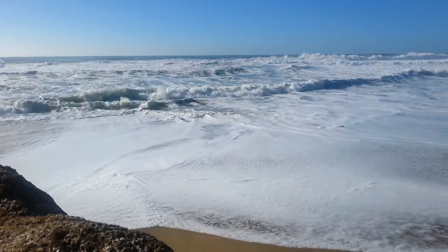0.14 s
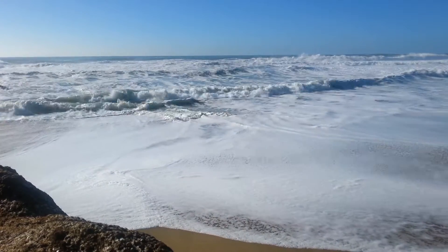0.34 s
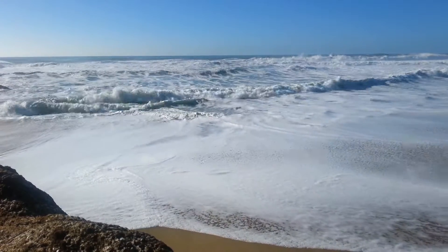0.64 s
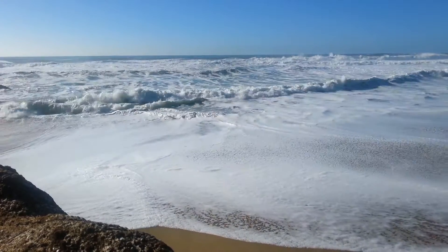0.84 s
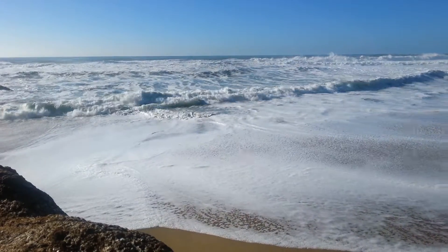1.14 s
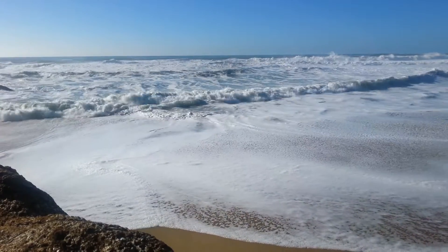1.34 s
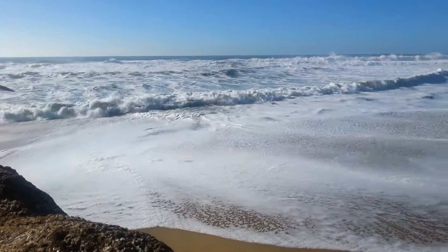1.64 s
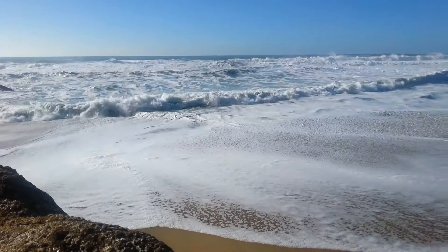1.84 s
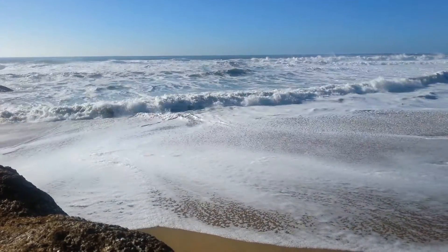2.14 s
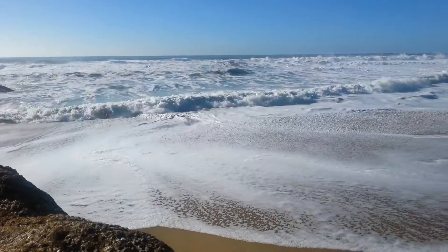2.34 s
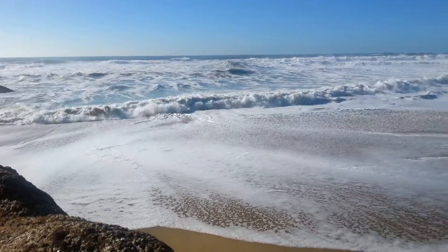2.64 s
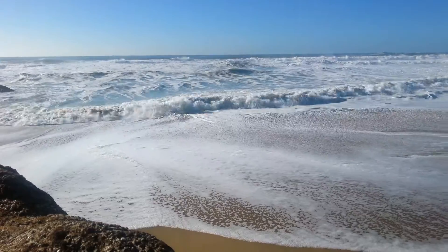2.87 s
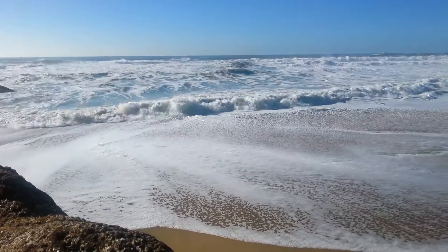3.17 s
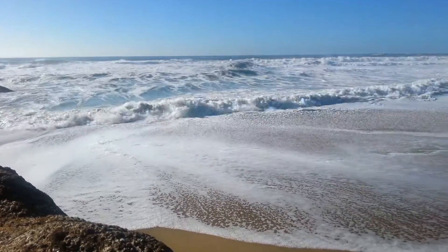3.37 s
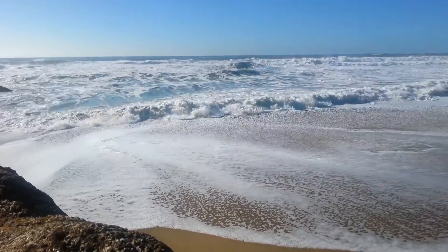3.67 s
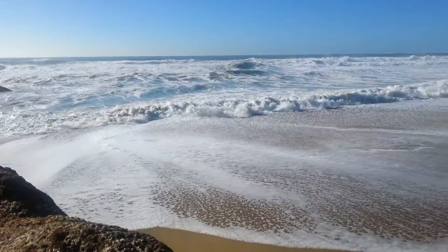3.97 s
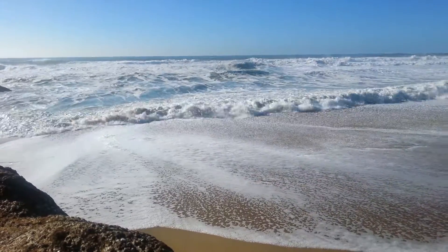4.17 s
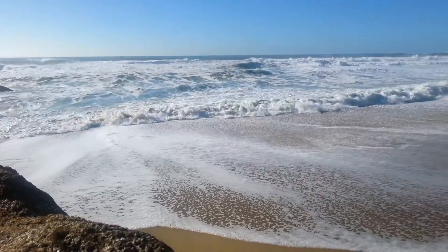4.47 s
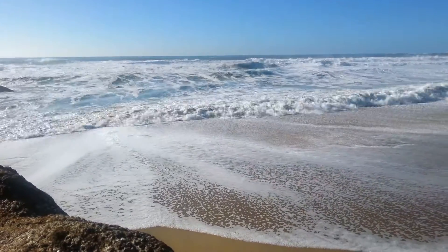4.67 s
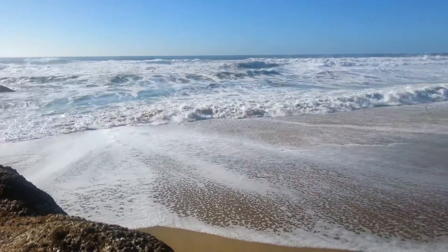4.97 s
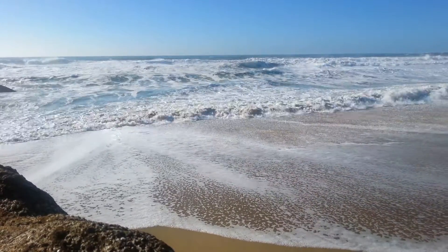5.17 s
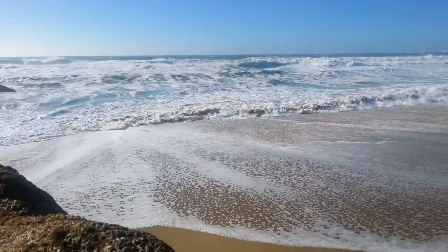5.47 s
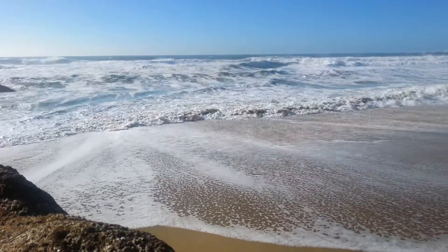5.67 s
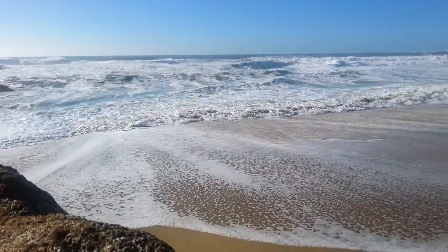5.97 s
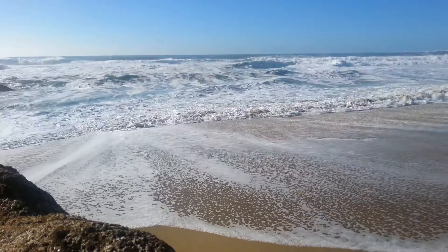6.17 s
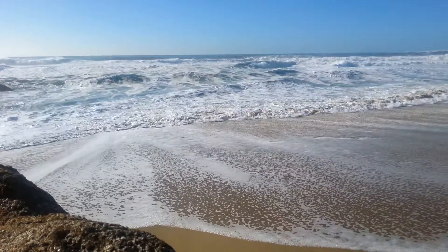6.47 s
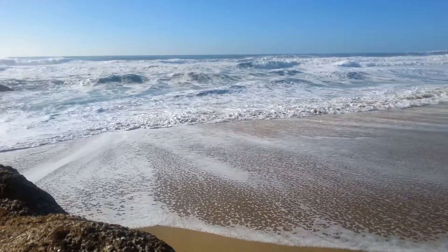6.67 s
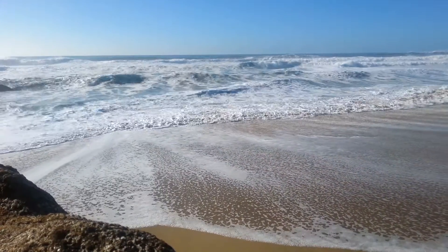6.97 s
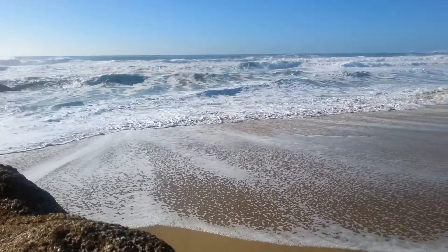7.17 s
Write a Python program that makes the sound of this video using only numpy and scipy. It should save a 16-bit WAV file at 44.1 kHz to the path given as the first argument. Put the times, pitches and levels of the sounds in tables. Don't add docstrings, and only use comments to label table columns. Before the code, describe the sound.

Heavy surf roars steadily off a sandy beach with fizzing foam while strong gusts thump, pop and flutter against an unprotected stereo microphone.

```python
import sys
import numpy as np
from scipy import signal
from scipy.fft import rfft, irfft, next_fast_len
from scipy.io import wavfile
from scipy.ndimage import uniform_filter1d, map_coordinates

SR = 44100
rng = np.random.default_rng(int(sys.argv[2]) if len(sys.argv) > 2 else 0)


def volts_from_db(level):
    exponent = np.asarray(level, float) / 20
    return 10 ** exponent


def wrap_up_sound(samples):
    columns = np.atleast_2d(samples).T
    tamed = np.clip(columns, -1, 1)
    steps = np.round(tamed * 32767).astype(np.int16)
    wavfile.write(sys.argv[1], SR, steps)


N = 322791


def unit(x):
    return x / np.sqrt(np.mean(x ** 2) + 1e-20)


def along(points, hz):
    f, v = np.transpose(points)
    return np.interp(np.log(hz + 1), np.log(f + 1), v)


def curves(rows):
    s, *cols = np.transpose(rows)
    return np.array([np.interp(np.arange(N) / SR, s, c) for c in cols])


def wobble(rate_hz):
    knots = rng.standard_normal(int(N / SR * 200))
    return map_coordinates(knots, [np.arange(N) * min(rate_hz, 190) / SR])


def filtered(x, response):
    m = next_fast_len(N + 8192)
    return irfft(rfft(x, m) * response(np.fft.rfftfreq(m, 1 / SR)), m)[..., :N]


def gusts():
    # t/s at full strength, held/s, left level/dB, right level/dB, suppressor opening/dB
    gust_rows = [(.18, .05, -17, -18, 3), (.34, .1, -21, -15, 5.5), (.455, .05, -19, -20, 0),
                 (.615, .04, -29.5, -21, 4.5), (.905, .09, -22, -17, 3.5), (1.14, .11, -23.5, -15.5, 3),
                 (1.31, .05, -22, -22, 1), (1.439, .05, -17.5, -21, 4), (2.135, .08, -24, -20.5, 2),
                 (2.291, .14, -26.5, -22, 3.5), (2.56, .06, -21.5, -18, 3), (2.9, .25, -26, -25.5, -1),
                 (3.362, .06, -27.5, -26, -0.5), (3.77, .09, -27, -23, 3.5),
                 (3.921, .27, -24.5, -18.5, 4.5), (4.39, .08, -24, -22, 3.5), (4.664, .03, -25, -23, 4.5),
                 (4.77, .14, -20.5, -16, 5), (5.308, .08, -21.5, -18.5, 3.5), (5.48, .1, -21, -19, 2.5),
                 (5.85, .12, -24.5, -17.5, 5), (6.055, .1, -26, -20.5, 5.5), (6.368, .04, -24.5, -23.5, 5),
                 (6.54, .04, -25.5, -22, 6)]
    # t/s, left level/dB, right level/dB
    lull = [(0, -32.5, -26), (1.9, -32, -36), (3.6, -33, -30), (4.5, -28.5, -24), (5.1, -25.5, -24),
            (7.32, -28.5, -27)]
    rise_db_s, fall_db_s = 280.5, 60.5
    open_db_s, close_db_s, linger_s = 111, 23, 0.011
    s, held, left, right, opens = np.transpose(gust_rows)[..., None]
    t = np.arange(0, N, 64) / SR

    def loss(up_db_s, down_db_s, more_s=0):
        before = (s - t) * up_db_s
        after = (t - s - held - more_s) * down_db_s
        return np.maximum(0, np.maximum(before, after))

    def per_sample(v):
        return np.interp(np.arange(N) / SR, t, v)

    gust_db = np.array([left, right]) - loss(rise_db_s, fall_db_s)
    power = np.sum(volts_from_db(2 * gust_db), axis=1)
    opening_db = np.max(np.maximum(0, opens - loss(open_db_s, close_db_s, linger_s)), axis=0)
    total = volts_from_db(2 * curves(lull)) + [per_sample(p) for p in power]
    return 10 * np.log10(total), per_sample(opening_db)


def churn(patchy_db):
    z = signal.stft(rng.standard_normal((2, N)), nperseg=512)[2]
    field = uniform_filter1d(rng.standard_normal(z.shape[1:]), size=6, axis=0)
    field = uniform_filter1d(field, size=14, axis=1)
    return signal.istft(z * volts_from_db(patchy_db * unit(field)), nperseg=512)[1][:, :N]


def water(left, right, lead):
    # f/Hz, left-right likeness (0-1)
    alike = [(60, 0.98), (300, 1), (700, 0.91), (1200, 1), (1700, 0.11), (2240, 0.27), (2750, 0.74),
             (3300, 0.13), (6000, 0.091), (12000, 0.067)]

    def mid_side(hz):
        turn = np.arccos(np.clip(along(alike, hz), -1, 1)) / 2
        return np.array([np.cos(turn), np.sin(turn)])

    def port_response(hz):
        phase = np.outer([1, -1], np.interp(hz, *np.transpose(lead)))
        return volts_from_db([along(left, hz), along(right, hz)]) * np.exp(.5j * phase)

    mid, side = filtered(churn(patchy_db=0.66), mid_side)
    x = filtered(np.array([mid + side, mid - side]), port_response)
    return x / np.std(filtered(x, lambda hz: (hz > 1200) & (hz < 9000)))


def sea(opening_db):
    # t/s, share of the late aim (0-1), sea level/dB
    swell = [(0, 0.08, -35.5), (.55, .08, -39), (1.2, .03, -35.5), (1.6, .1, -36), (2.0, .2, -34.5),
             (2.4, 0.23, -35), (2.7, 0.1, -35.5), (3.05, 0.26, -36), (3.6, 0.5, -36), (4.1, .78, -37),
             (4.7, .8, -36), (5.2, 0.84, -36), (5.75, .9, -36.5), (6.3, 0.93, -39.5), (6.8, 0.91, -37.5),
             (7.32, 0.77, -38.5)]
    # f/Hz, density/dB per Hz
    left_first = [(40, -37), (110, -6), (239, -1), (485, -16), (715, -8), (884, -16), (1994, -19),
                  (2465, -18), (3048, -28), (3903, -23), (5558, -33.5), (6632, -41), (10500, -42),
                  (14700, -59)]
    right_first = [(40, -25.5), (110, -14.5), (140, -1), (256, -7), (539, -12.5), (983, -13), (1259, -19),
                   (2066, -24.5), (3048, -30), (4189, -27), (5758, -34), (7914, -31), (10500, -46),
                   (14700, -74)]
    left_late = [(40, -22.5), (239, 2.5), (450, -12), (745, -9), (854, -26), (1133, -12), (2066, -23),
                 (2380, -16.5), (2942, -26.5), (3768, -24.5), (7500, -42.5), (9200, -41.5), (10200, -48.5),
                 (14700, -63)]
    right_late = [(40, -28), (110, -4.5), (239, -2), (854, -18), (1451, -16.5), (1671, -22.5), (1994, -20),
                  (3903, -32.5), (4825, -31), (5558, -38.5), (7639, -33.5), (9443, -42.5), (10500, -51.5),
                  (14700, -73)]
    # f/Hz, lead/rad
    lead_first = [(0, 0), (860, -1.0), (1290, -1.17), (2150, -6.5), (2760, -9.5), (4740, -13),
                  (5510, -24.5), (5940, -22), (7320, -33), (9220, -39.5), (10200, -36), (11400, -44.5),
                  (11900, -33.5), (14300, -29)]
    lead_late = [(0, 0), (780, 0.5), (1550, 2.5), (2410, -0.8), (3100, -5), (3880, -4.5), (5600, 2),
                 (6370, 4), (6630, 1.6), (8790, -10), (10100, -16.5), (11100, -2.5), (11700, -16.5),
                 (14300, -12)]
    roar_db, roar_pan_db = 0.04, -2.4
    foam_db, foam_pan_db, foam_turn_db = 0.32, -0.7, 1

    aim, swell_db = curves(swell)
    aim = np.clip(aim, 0, 1)
    surf = np.sqrt(1 - aim) * water(left_first, right_first, lead_first)
    surf += np.sqrt(aim) * water(left_late, right_late, lead_late)
    roar = filtered(surf, lambda hz: 1 / (1 + (hz / 3000) ** 6))
    foam = surf - roar
    side = np.array([[.5], [-.5]])
    mix = roar * volts_from_db(roar_db + side * roar_pan_db)
    mix += foam * volts_from_db(foam_db + side * (foam_pan_db + foam_turn_db * aim))
    return mix * volts_from_db(swell_db + opening_db + 1.5 + 0.32 * wobble(25))


def small_pops(level_db, count):
    pitch_hz, cycles, scatter_oct = 245, 1.4, 0.29
    over_gust_db, spread_db, top_db = 8, 1.9, -13.5
    share = np.cumsum(volts_from_db(1.3 * level_db))
    pitch, size, long = rng.standard_normal((3, count))
    quantile = (np.arange(count) + rng.uniform(0, 1, count)) / count
    at = np.searchsorted(share / share[-1], quantile).clip(1600, N - 1)
    peak_db = np.minimum(level_db[at] + over_gust_db + spread_db * size, top_db)
    hz = pitch_hz * 2 ** (scatter_oct * pitch)
    return list(zip(at / SR, peak_db, hz, cycles * 2 ** (scatter_oct * (pitch + long))))


def pops(rows):
    out, t = np.zeros(N + SR), np.arange(-1500, 1500) / SR
    chances = rng.uniform(-1, 1, (len(rows), 3))
    for (s, db, hz, cycles), (phase, upper, glide) in zip(rows, chances):
        bump = np.exp(-(t * hz / max(0.71 * cycles, .2)) ** 2)
        angle = 2 * np.pi * hz * t * (1 + 18 * glide * t) + np.pi * phase
        shake = np.cos(angle) + 0.25 * bump * np.cos(1.9 * angle + np.pi * upper)
        out[round(s * SR) - 1500:][:len(t)] += volts_from_db(min(db - .8, -.7)) * bump * shake
    return out[:N]


def wind(level_db):
    # f/Hz, density/dB per Hz
    buffet_curve = [(25, -43), (45, -17), (80, -4), (130, -1.5), (210, 2), (330, -7.5), (500, -14.5),
                    (800, -27), (1500, -39), (4000, -63.5)]
    rasp_curve = [(150, -16), (300, -2.5), (450, 5), (800, -11.5), (1500, -20), (4000, -65.5)]
    # t/s, peak/dB, f/Hz, length/cycles
    left_pops = [(.184, -5, 326, 3.3), (.201, -2, 293, 0.72), (.406, -7, 274, .8), (.466, -8, 262, 1.6),
                 (.993, -12, 296, 2.3), (1.314, -13, 310, 2.5), (1.337, -17, 281, 1.6),
                 (1.442, -8, 290, 1.2), (2.435, -5, 263, 0.88), (2.604, -11, 246, 1.9),
                 (3.358, -9, 250, 1.5), (4.039, -9, 204, 1.3), (4.239, -9, 212, 1.2), (4.385, -9, 264, 1.4),
                 (4.418, -10, 220, 1.2), (4.893, -14, 232, 1.2), (5.407, -18, 221, 0.71),
                 (5.509, -10, 280, 1.5), (5.884, -16, 262, 1.5), (6.595, -10, 224, 1.4)]
    right_pops = [(.186, -6, 204, .95), (.207, 2, 285, 0.62), (.289, -1.5, 307, 1.34),
                  (.351, -4.5, 232, 1.1), (.373, -2.5, 310, 1.9), (.427, -29, 264, .9),
                  (.615, -1.5, 279, 1.26), (.906, -4.5, 328, 0.93), (.921, -4.5, 212, 2.6),
                  (.944, 1.5, 183, 0.98), (1.05, -5.5, 245, 1.1), (1.136, -8, 238, 1.5),
                  (1.168, -5, 380, 2.2), (1.19, 3, 283, 2.1), (1.24, -8, 340, 3.6), (1.487, -7.5, 204, 1.1),
                  (2.382, -5, 177, 1.3), (3.917, -4, 313, 1.9), (4.121, -6, 329, 1.4),
                  (4.154, -3, 280, 0.55), (4.384, -3, 310, 1.5), (4.67, -12, 235, 1.6), (4.894, -3, 336, 4),
                  (4.958, -6, 301, 1.3), (5.358, -6, 214, 1.3), (5.518, -5, 229, 4.1),
                  (5.919, -2.5, 276, 4.3), (6.066, -9.5, 260, 1.3), (6.366, -2.5, 220, 0.85),
                  (6.553, -4.5, 254, 1.15)]
    # t/s, peak/dB, width/s, port (0 left, 1 right)
    snaps = [
        (.2075, 5.5, .00027, 0),
        (1.1426, -9, .0003, 1),
        (4.7906, -12, .00025, 1),
        (4.894, -4, .0004, 1),
        (5.367, -3, .0005, 1),
    ]

    eddies = volts_from_db(2.4 * np.array([wobble(45), wobble(45)])) * rng.standard_normal((2, N))
    rumble = unit(filtered(eddies, lambda hz: volts_from_db(along(buffet_curve, hz))))
    rasp = unit(filtered(eddies, lambda hz: volts_from_db(along(rasp_curve, hz))))
    rasp_db = 0.61 * (level_db + 8.5) - 11.0
    out = volts_from_db(level_db) * (rumble + volts_from_db(rasp_db) * rasp)

    left = pops(left_pops + small_pops(level_db[0], count=24))
    right = pops(right_pops + small_pops(level_db[1], count=56))
    bursts = np.array([left, right])
    near = np.abs(uniform_filter1d(np.abs(bursts), size=700)) + .03
    crowding = (near / uniform_filter1d(near, size=7000)) ** .4
    out = out * crowding + bursts
    out = out + .06 * out[::-1]
    for s, db, width_s, port in snaps:
        u = (np.arange(N) / SR - s) / width_s
        out[port] += volts_from_db(db) * (1 - .6 * u * u) * np.exp(-u * u / 2)
    return out


def scene():
    level_db, opening_db = gusts()
    hiss = volts_from_db(-59) * rng.standard_normal((2, N))
    return sea(opening_db) + wind(level_db) + hiss


def coarse_lines(x):
    # f/Hz, step/dB
    step_curve = [(300, -30.5), (2000, -33), (4000, -35), (6000, -37), (8500, -38.5), (10400, -37),
                  (12200, -39.7), (14700, -40)]
    m, early = 1024, 330
    angle = np.pi / m * np.outer(np.arange(2 * m) + .5 + m / 2, np.arange(m) + .5)
    basis = np.cos(angle) * np.sqrt(2 / m)
    basis = basis * signal.windows.kaiser_bessel_derived(2 * m, 4 * np.pi)[:, None]
    blocks = np.pad(x, ((0, 0), (m + early, 2 * m - (N + early) % m))).reshape(2, -1, m)
    lines = np.concatenate([blocks[:, :-1], blocks[:, 1:]], axis=2) @ basis

    loud_db = 10 * np.log10(np.mean(lines[..., 100:400] ** 2, axis=(0, 2)) + 1e-9)
    chance_db = np.repeat(rng.standard_normal((*lines.shape[:2], m // 32)), 32, axis=2)
    step_db = along(step_curve, np.arange(m) * SR / 2 / m)
    step = volts_from_db(step_db + 0.83 * (loud_db[:, None] + 31.5) + 1.5 * chance_db)
    whole = np.floor((np.abs(lines) / step) ** .75 + .4054)
    lines = np.sign(lines) * whole ** (4 / 3) * step

    frames = lines @ basis.T
    return (frames[:, 1:, :m] + frames[:, :-1, m:]).reshape(2, -1)[:, early:early + N]


def low_pass(x):
    return signal.sosfilt(signal.butter(12, 14630, fs=SR, output="sos"), x)


def record(dry):
    x = filtered(dry, lambda hz: hz ** 4 / (hz ** 4 + 50 ** 4) + volts_from_db(-44.5))
    mix = coarse_lines(np.clip(x, -1, 1))
    return low_pass(mix)


dry = scene()
out = record(dry)
wrap_up_sound(out)
```